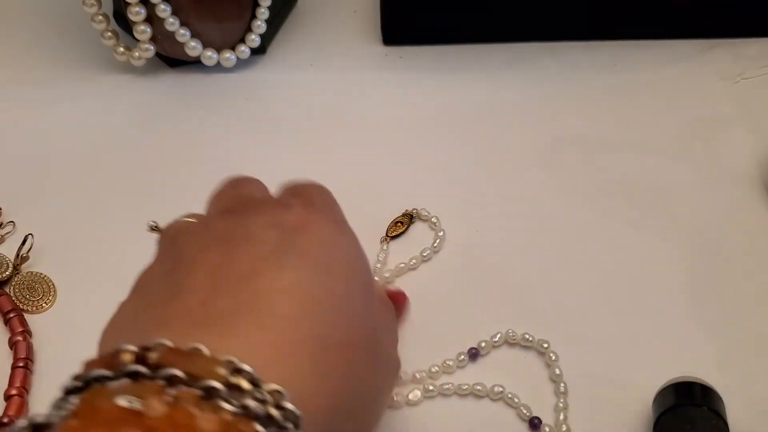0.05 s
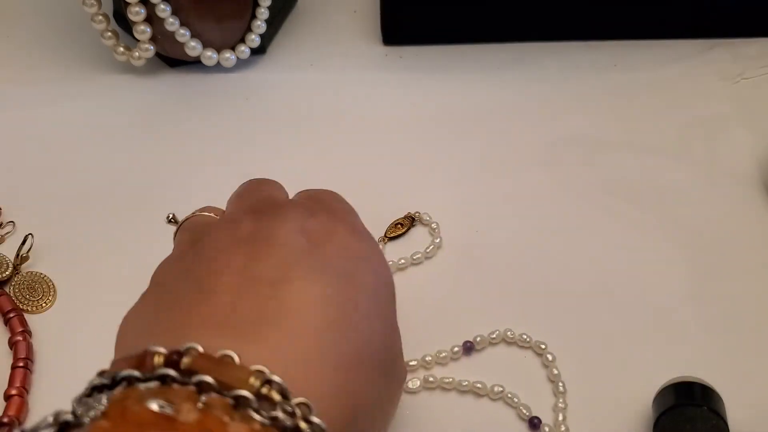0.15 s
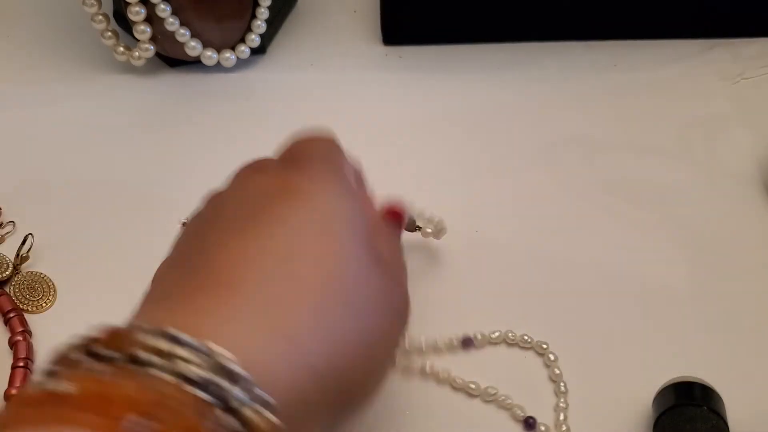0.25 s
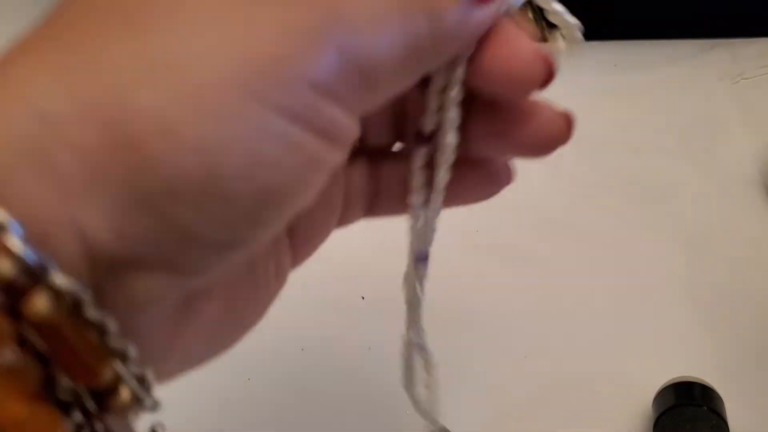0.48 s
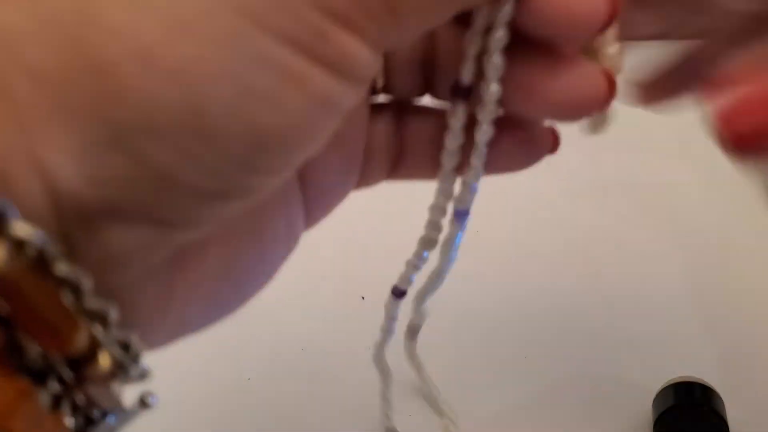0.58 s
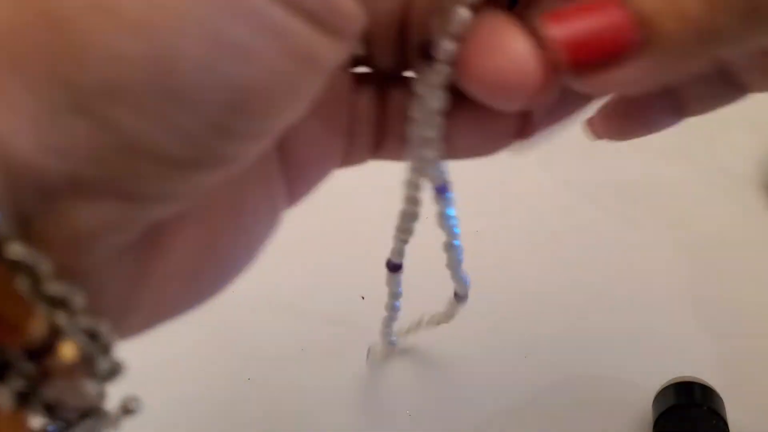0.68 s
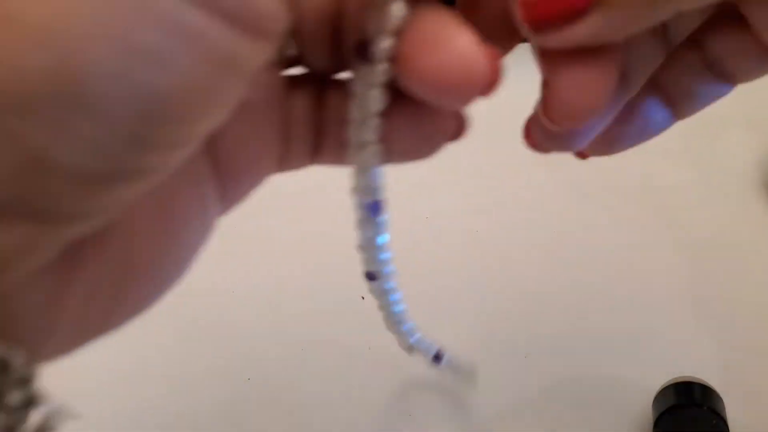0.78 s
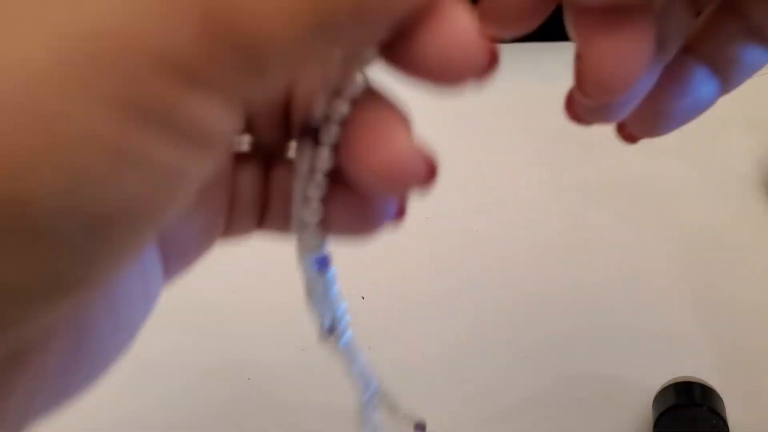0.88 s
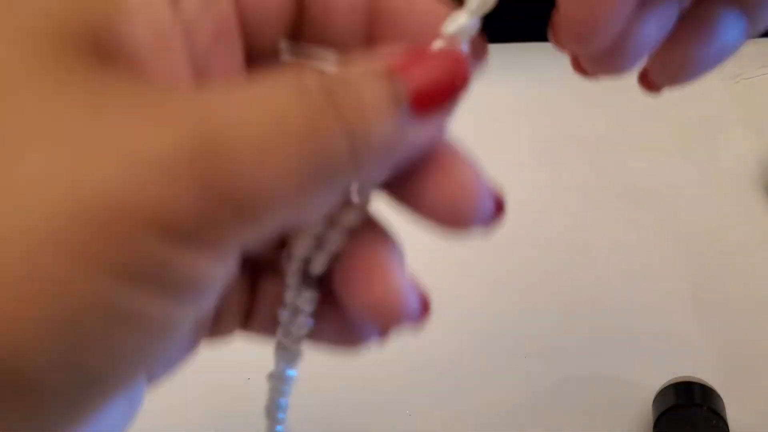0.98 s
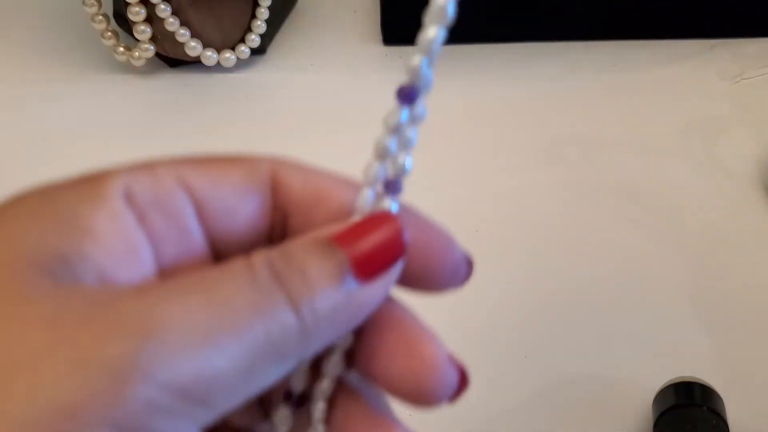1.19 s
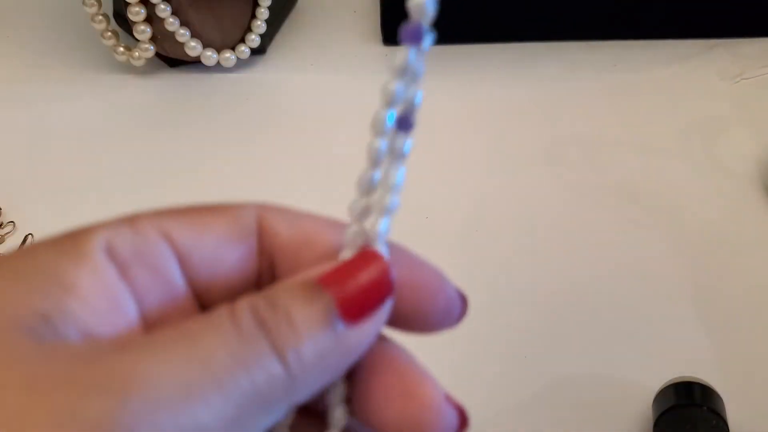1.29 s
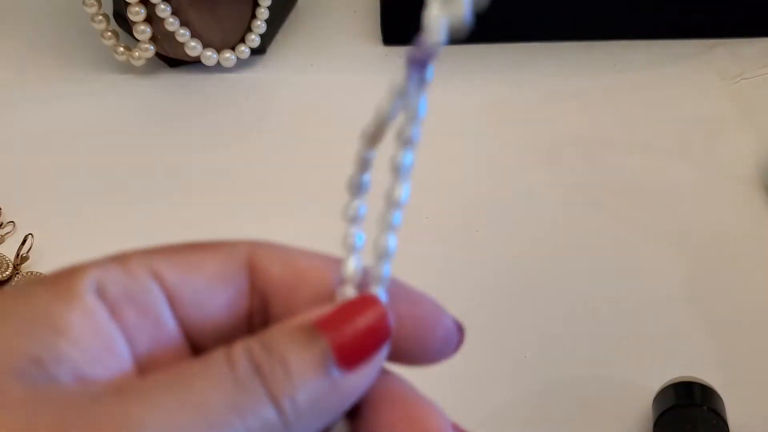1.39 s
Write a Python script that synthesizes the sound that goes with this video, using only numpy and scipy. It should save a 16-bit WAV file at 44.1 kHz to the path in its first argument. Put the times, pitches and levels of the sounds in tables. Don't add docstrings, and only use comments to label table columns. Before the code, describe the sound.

A bead necklace is gathered from a table: nail taps and tiny scrapes, then hollow wrist bumps with clacking bangles, fading slips and two late bright clinks, close stereo microphone in a quiet humming room.

```python
import sys
import numpy as np
from scipy import signal
from scipy.fft import rfft, irfft, next_fast_len
from scipy.io import wavfile
from scipy.ndimage import uniform_filter1d, map_coordinates

SR = 44100
rng = np.random.default_rng(int(sys.argv[2]) if len(sys.argv) > 2 else 0)


def log_audio(samples):
    frames = np.atleast_2d(samples).T
    limited = np.clip(frames, -1, 1)
    pcm = np.round(limited * 32767).astype(np.int16)
    wavfile.write(sys.argv[1], SR, pcm)


def nominal_scale(level):
    x = np.asarray(level, float) / 20
    return 10 ** x


N = 63945


def unit(x):
    return x / np.sqrt(np.mean(x ** 2) + 1e-20)


def along(points, hz):
    point_hz, value = np.transpose(points)
    return np.interp(np.log(hz + 1), np.log(point_hz + 1), value)


def filtered(x, response):
    m = next_fast_len(x.shape[-1] + 4096)
    spectrum = rfft(x, m) * response(np.fft.rfftfreq(m, 1 / SR))
    return irfft(spectrum, m)[..., :x.shape[-1]]


def wobble(rate_hz):
    knots = rng.standard_normal(int(N * 400 / SR) + 4)
    return map_coordinates(knots, [np.arange(N) * rate_hz / SR])


def add(out, start_s, x, pan_db, lag_s):
    for channel, sign in enumerate((1, -1)):
        i = round((start_s + sign * lag_s / 2) * SR)
        part = x[max(-i, 0):][:N - max(i, 0)]
        out[channel, max(i, 0):][:len(part)] += nominal_scale(sign * pan_db / 2) * part


def ring(modes, t, rise_s, phases):
    total = np.zeros(len(t))
    for (hz, db, t60_s), phase in zip(modes, phases):
        total += nominal_scale(db - 60 * t / t60_s) * np.sin(2 * np.pi * hz * t + phase)
    return total * (1 - np.exp(-t / rise_s))


def burst(t60_s, rise_s, response):
    t = np.arange(2048) / SR
    x = filtered(rng.standard_normal(len(t)), response)
    x = x * nominal_scale(-60 * t / t60_s) * (1 - np.exp(-t / rise_s))
    return x / abs(x).max()


def pair(response, alike):
    def turn(hz):
        return np.arccos(np.clip(along(alike, hz), -1, 1)) / 2

    def shared_and_opposite(hz):
        return response(hz) * [np.cos(turn(hz)), np.sin(turn(hz))]

    a, b = filtered(rng.standard_normal((2, N)), shared_and_opposite)
    return unit(np.array([a + b, a - b]))


# hit_s, peak_db, upper_modes_db, hard_edge_db
THUDS = [(.049, -36.5, -2.5, -4), (.2, -30.5, -9.5, 16), (0.204, -21.5, -6, -36), (0.25, -41, 0, -11),
         (0.2946, -12, 2.5, -30), (0.3439, -23.5, 5, -18.5), (0.352, -27.5, 5, -20.5),
         (0.3757, -25, 4.5, -20), (.391, -30.5, -3, -17), (0.427, -39.5, 9, 5), (0.44, -37, 1, 2.5),
         (0.4703, -24, 3, 11), (.478, -49, 14.5, 25), (0.5004, -36.5, -4, 25), (.520, -49.5, 17.5, 22),
         (.73, -54, -7.5, -8)]
# pitch_hz, level_db, t60_s
TOP_LOW = [(65.7, -29.5, 0.36), (115, 4, 0.086)]
TOP_HIGH = [(178.3, -0.5, 0.061), (227, -6.5, 0.081)]
TOP_EDGE = [(377.5, -11.5, 0.0293), (543, -19.5, 0.032)]


def wrist_thuds():
    out, t = np.zeros((2, N)), np.arange(SR // 3) / SR
    rise_s, pan_db, lag_s, cut_hz = 0.0014, -3, 0.00036, 55
    for start_s, db, upper_db, edge_db in THUDS:
        x = ring(TOP_LOW, t, rise_s, np.zeros(9))
        x = x + nominal_scale(upper_db) * ring(TOP_HIGH, t, rise_s, -np.arange(9) * .5)
        x = x + nominal_scale(edge_db) * ring(TOP_EDGE, t, rise_s, rng.uniform(-2.3, 0, 2))
        add(out, start_s, nominal_scale(db) * x * (1 - np.exp(-t / rise_s)), pan_db, lag_s)
    return filtered(out, lambda hz: (1j * hz / (cut_hz + 1j * hz)) ** 2)


# hit_s, peak_db
BANGLE_ON_TOP = [(760, 2.5, 0.006), (1128, -0.5, 0.012), (1860, -2.5, .025), (2340, -2, 0.011),
                 (3680, -8, 0.015), (3980, -6, 0.026), (6030, -26.5, 0.023), (6960, -18.5, 0.013)]
BANGLE_KNOCKS = [
    (.199, -45),
    (.2912, -14),
    (.2958, -22),
    (.502, -32.5),
    (.5226, -31),
]
BANGLE_RIM = [(1096, -8.5, .012), (2500, 2, 0.004), (3327, -12, .01), (3780, -10.5, .009),
              (5900, -28.5, 0.0089)]
RIM_KNOCKS = [(.201, -38.5), (0.341, -22.5), (0.3455, -36), (0.371, -24.5), (0.391, -27), (0.4667, -24),
              (.4946, -41), (.732, -50)]
CLASP = [(1000, -2, .013), (1370, 0, .011), (1900, -3, .006), (2400, -3, .006), (3750, -3, .012),
         (5500, -8, .008), (6500, -9, .007)]
CLASP_KNOCKS = [(0.3967, -14), (.441, -31), (0.443, -32), (0.449, -49), (0.4516, -44), (0.89, -59),
                (1.437, -56.5)]
NAIL = [(1410, -5, 0.0097), (1854, 5, 0.02), (2195, 4.5, 0.015), (2850, -5, 0.015)]
NAIL_KNOCKS = [(0.0468, -33), (.062, -55), (0.0653, -26), (0.076, -33.5), (0.095, -34), (0.1136, -28.5),
               (0.1215, -30.5), (.142, -41)]


def knocks():
    out, t = np.zeros((2, N)), np.arange(2048) / SR
    bodies = [(BANGLE_ON_TOP, BANGLE_KNOCKS, -3.5, .00034),  # modes, hits, pan dB, left lag s
              (BANGLE_RIM, RIM_KNOCKS, -3.5, .00034),
              (CLASP, CLASP_KNOCKS, -0.5, .00016),
              (NAIL, NAIL_KNOCKS, 4, -.0006)]
    scatter_db, rise_s = 5, 0.00033
    for modes, hits, pan_db, lag_s in bodies:
        for start_s, db in hits:
            struck = [(hz * (1 + 0.0097 * u), level + scatter_db * v, t60_s)
                      for (hz, level, t60_s), (u, v) in zip(modes, rng.standard_normal((9, 2)))]
            x = ring(struck, t, rise_s, rng.uniform(0, 2 * np.pi, 9) / 3)
            add(out, start_s, nominal_scale(db) * x / abs(x).max(), pan_db, lag_s)
    return out


# hit_s, peak_db, left_right_db
TICKS = [(0.159, -35, 6), (0.2907, -33, -2), (0.4093, -29, -2), (.4508, -42, -2), (0.4673, -22, -2),
         (0.7548, -60, -2), (0.8896, -51, -2), (.937, -52, -2), (0.9484, -57, -2), (1.0655, -25, -5),
         (1.0904, -38, -4), (1.1823, -59, -2), (1.3876, -39, 2), (1.3983, -44, 2), (1.4191, -55, 2),
         (1.437, -59, 2)]
# pitch_hz, level_db
TICK_BODY = [(3000, -30.5), (5500, -0.5), (9000, -5), (13000, 4), (16000, -4)]


def glass_ticks():
    out = np.zeros((2, N))
    for start_s, db, pan_db in TICKS:
        crack = burst(0.022, 0.0001, lambda hz: nominal_scale(along(TICK_BODY, hz)))
        add(out, start_s, nominal_scale(db) * crack, pan_db, -.0003)
    return out


# hit_s, peak_db, left_right_db, free_s (ringing time before it is touched)
WIDE = [(6062, -16, .06), (10320, 0, .15), (10378, -12, .3)]
WIDE_HITS = [(-.02, -48, -2, .1), (0.158, -49.5, 9, 0.097), (0.407, -49, 10, 0.037),
             (1.0659, -36, -25, .009), (1.068, -39, 0, 0.43), (1.3866, -44, 10.5, .1)]
THIN = [(13150, 0, .08), (13296, -13, .1), (13600, -14, .06)]
THIN_HITS = [
    (.159, -36, 7, .06),
    (0.344, -38.5, -13, 0.057),
    (1.065, -23.5, -3, 0.007),
    (1.07, -38, 10, .2),
]
FREE = [(11535, 0, .31)]
FREE_HITS = [
    (0.106, -47, 2, .04),
    (1.0672, -38, -4.5, .4),
    (1.391, -50, 3, .1),
]
CAPPED = [(14370, 0, .09)]
CAPPED_HITS = [
    (0.16, -35.5, 2.6, .06),
]
SMALL = [(15397, 0, .25), (15592, -9, .35), (15784, -24, .1)]
SMALL_HITS = [(0.21, -46, -8, 0.017), (0.2277, -36, 4, 0.01), (0.303, -41, -7, 0.047),
              (0.3506, -40.5, 23, 0.11), (0.405, -34, 2, 0.036), (.461, -30, 16, 0.014),
              (0.4671, -26.5, -13.5, 0.051), (0.486, -33, 10, .13)]
BEADED = [(12380, 0, .03), (13250, -3, .025), (7700, -5, .04)]
BEADED_HITS = [(.347, -40, 5, 0.06), (.408, -47, 6, .03), (0.452, -41, 0, .012), (.466, -30, -3, 0.018),
               (0.483, -36, 4, 0.009), (.493, -35.5, -8, 0.0099)]
CHARM = [(5752, 0, .12)]
CHARM_HITS = [(0.207, -59, 0, .012), (.224, -69, 0, 0.017), (.298, -67, 0, 0.025), (.45, -61, 0, 0.0093),
              (0.48, -40.5, 0.016, 0.02), (.52, -45, 0, 0.055)]
STRAND = [(4960, 0, .4), (5060, -1, .3), (5150, -4, .3)]
STRAND_HITS = [
    (.715, -58.5, 0.0095, .14),
]
LOOSE = [(13670, 0, .07)]
LOOSE_HITS = [
    (1.3872, -42, 3, .1),
]


def bangles():
    out, t = np.zeros((2, N)), np.arange(SR // 2) / SR
    rise_s, damp_t60_s, rattle_db = 0.0034, 0.011, 2
    pieces = [(WIDE, WIDE_HITS), (THIN, THIN_HITS), (FREE, FREE_HITS), (CAPPED, CAPPED_HITS),
              (SMALL, SMALL_HITS), (BEADED, BEADED_HITS), (CHARM, CHARM_HITS),
              (STRAND, STRAND_HITS), (LOOSE, LOOSE_HITS)]
    for modes, hits in pieces:
        for start_s, db, pan_db, free_s in hits:
            damping_db = 60 * np.maximum(t - free_s, 0) / damp_t60_s
            level_db = db - damping_db + rattle_db * wobble(250)[:len(t)]
            x = ring(modes, t, rise_s, rng.uniform(0, 2 * np.pi, 9)) * nominal_scale(level_db)
            add(out, start_s, x, pan_db, -.0003)
    return out


def patchy(x):
    z = signal.stft(x, nperseg=256)[2]
    field = uniform_filter1d(rng.standard_normal(z.shape[1:]), 5, 0)
    field = uniform_filter1d(field, 12, 1)
    return unit(signal.istft(z * nominal_scale(1.6 * unit(field)), nperseg=256)[1][:, :N])


def grain():
    slips = unit(uniform_filter1d(rng.standard_normal(N), int(SR / 2500)))
    return nominal_scale(1 * slips + 1.8 * wobble(120))


# time_s, level_db, sheen_over_it_db
STROKES = [
    [(0, -66, 2), (.042, -61, 0), (.058, -58.5, -9.5), (.068, -45.5, -12.5), (.085, -46, 0),
     (.125, -47.5, 0.5), (.135, -47, -6), (.15, -52, -3), (.19, -60.5, -1)],
    [(.19, -56.5, -2.5), (.25, -57.5, 3.5), (.285, -54.5, -0.5), (.31, -51.5, -5.5), (.43, -48, -1.5),
     (.5, -41.5, -3.5), (.575, -47.5, -5), (.63, -62, -6)],
    [(.57, -61, 2), (.61, -49.5, 0.5), (.65, -53.5, 0.5), (.685, -53, 5.5), (.708, -60, 4)],
    [(.889, -63.5, 11), (.9, -58.5, 2), (.92, -54.5, 0), (.94, -57, 6.5), (.947, -66, 0.5), (.99, -62, 3.5),
     (1.025, -62.5, 10), (1.04, -61.5, 5.5), (1.057, -79.5, 23), (1.064, -60.5, 7.5), (1.092, -60, 2.5),
     (1.112, -73.5, -2)],
]
# pitch_hz, width_hz, level_db
SCRAPE_PEAKS = [
    [(1280, 340, 4.5), (1780, 320, 6), (2780, 430, 6)],
    [(1100, 200, 3), (1840, 480, -0.5), (2920, 190, 0.5), (5750, 250, 7)],
    [(590, 940, -13), (1590, 120, 9), (2970, 210, 10)],
    [(995, 78, 7), (2110, 99, 9.5), (2970, 220, 8), (4500, 320, 6.5), (5280, 230, 11.5)],
]
STROKE_LAG_SAMPLES = [-28, -4, 4, 4]
# pitch_hz, level_db
SCRAPE = [(300, -48.5), (800, -6), (2000, -3.5), (3200, -4.5), (4500, -15.5), (8000, -42)]
SHEEN = [(2500, -17.5), (4700, -3.5), (7000, 0), (10000, -7.5), (16000, -7)]
SHAKE = [(30, -20), (100, -4), (300, -1), (600, -14), (1200, -27)]


def sliding():
    t, out = np.arange(N) / SR, np.zeros((2, N))
    alike = [(1000, 0.2)]
    scrape = patchy(grain() * pair(lambda hz: nominal_scale(along(SCRAPE, hz)), alike))
    sheen = patchy(grain() * pair(lambda hz: nominal_scale(along(SHEEN, hz)), alike))
    shudder = pair(lambda hz: nominal_scale(along(SHAKE, hz)), [(100, 1.0), (600, 0.59)])
    shudder = unit(nominal_scale(1.28 * wobble(57.0)) * shudder)
    pans_db, shudders_db = [1.5, 0, 0, 0.5], [-9, -8, -20, -16.5]
    for stroke, peaks, pan_db, shudder_db, lag in zip(STROKES, SCRAPE_PEAKS, pans_db, shudders_db,
                                                      STROKE_LAG_SAMPLES):
        def body(hz):
            return nominal_scale(sum(db * np.exp(-((hz - centre) / width) ** 2) for centre, width, db in peaks))

        def through_body(x):
            return unit(filtered(np.array([np.roll(x[0], lag), x[1]]), body))

        time_s, level, bright = np.transpose(stroke)
        level_db = np.interp(t, time_s, level) + np.array([[.5], [-.5]]) * pan_db
        sheen_db = np.interp(t, time_s, bright)
        edge = np.clip(np.minimum(t - time_s[0], time_s[-1] - t) / 0.0006 + .5, 0, 1)
        mix = through_body(scrape) + nominal_scale(sheen_db) * through_body(sheen) + nominal_scale(shudder_db) * shudder
        out += edge * nominal_scale(level_db) * mix
    return out


def walls(x):
    t = np.arange(SR // 5) / SR
    tail = rng.standard_normal((2, len(t))) * nominal_scale(-60 * t / .1) * (t > .002)
    return nominal_scale(-13) * signal.fftconvolve(x, tail / np.linalg.norm(tail[0]), axes=1)[:, :N]


# pitch_hz, level_db
ROOM = [(22, -12.5), (62, 1), (301, -6.5), (513, -19), (1220, -22), (4940, -25), (6540, -25.5),
        (16000, -28)]
# pitch_hz, likeness (1 same, -1 opposite)
ROOM_ALIKE = [(60, 1), (380, -0.41), (2380, 0.24), (15000, -0.1)]


def room_hum():
    def colour(hz):
        duct_db = 13 * np.exp(-((hz - 713) / 30) ** 2)
        return nominal_scale(along(ROOM, hz) + duct_db)

    return nominal_scale(-67 + .8 * wobble(6.2)) * pair(colour, ROOM_ALIKE)


def scene():
    hard = sliding() + bangles() + knocks() + glass_ticks()
    return hard + walls(hard) + wrist_thuds() + room_hum()


def roll_off(x):
    return signal.sosfilt(signal.butter(12, 17120, fs=SR, output="sos"), x)


def record(dry):
    mix = filtered(dry, lambda hz: 1 / np.sqrt(1 + (hz / 15850) ** 300))
    return roll_off(mix)


dry = scene()
out = record(dry)
log_audio(out)
```